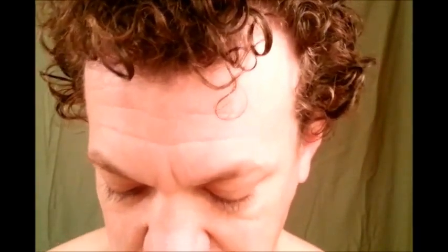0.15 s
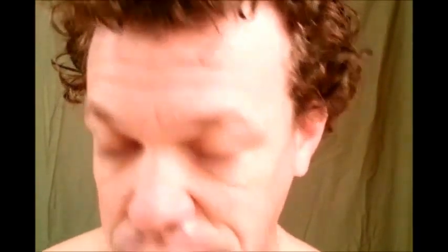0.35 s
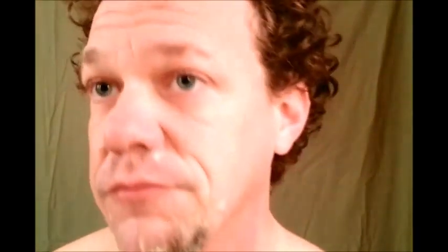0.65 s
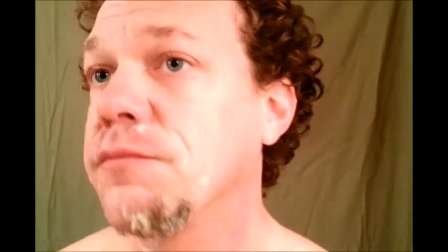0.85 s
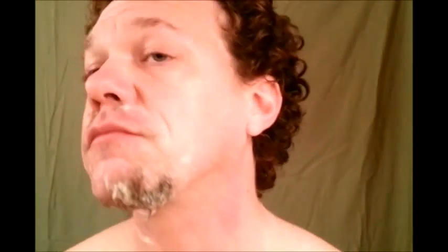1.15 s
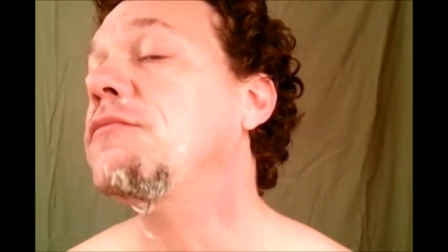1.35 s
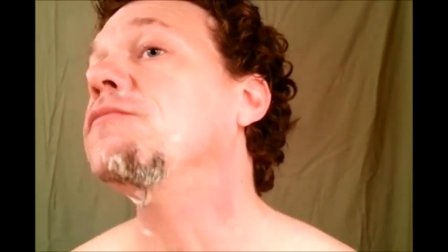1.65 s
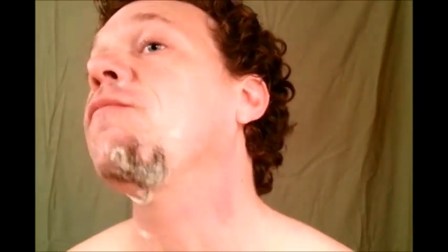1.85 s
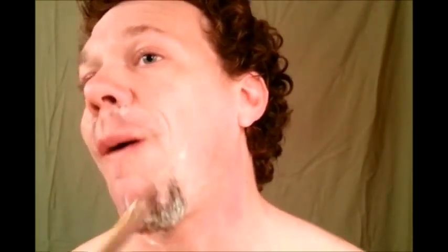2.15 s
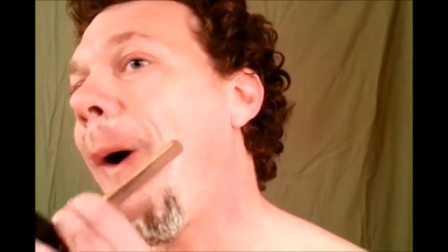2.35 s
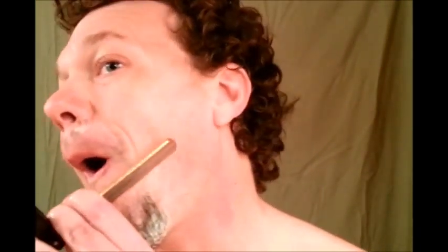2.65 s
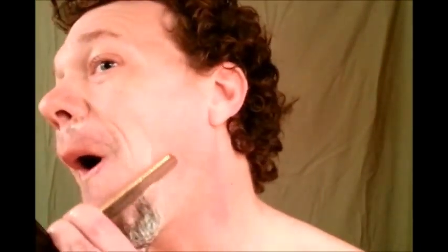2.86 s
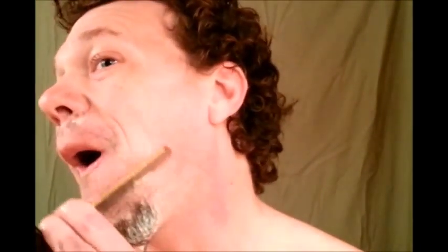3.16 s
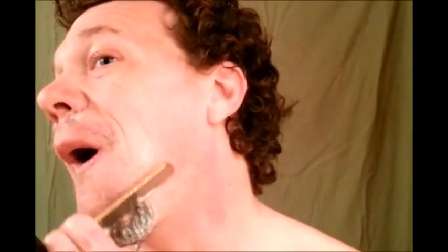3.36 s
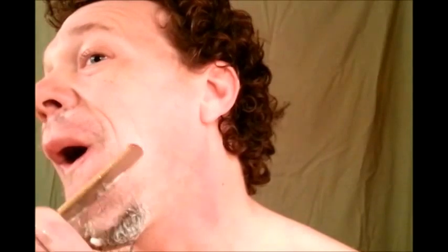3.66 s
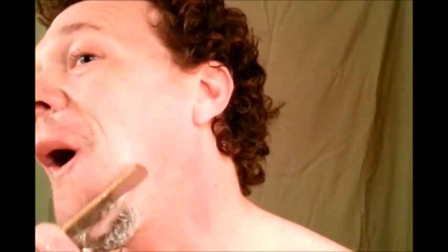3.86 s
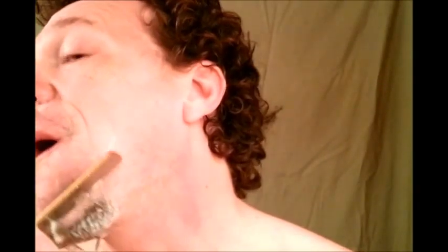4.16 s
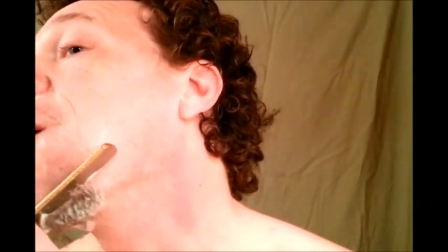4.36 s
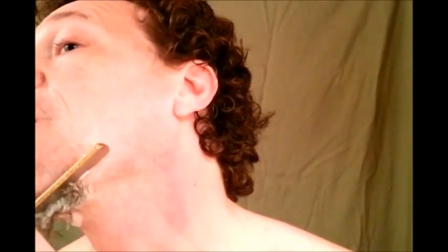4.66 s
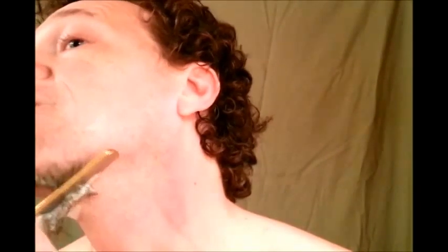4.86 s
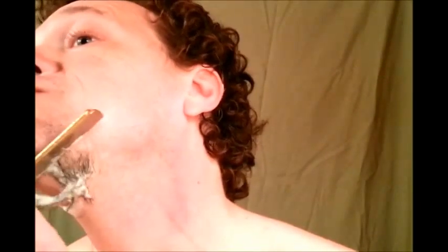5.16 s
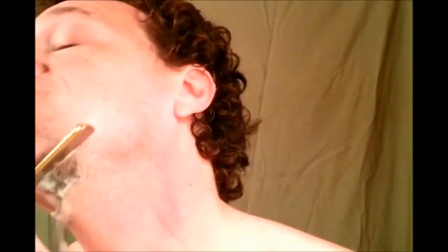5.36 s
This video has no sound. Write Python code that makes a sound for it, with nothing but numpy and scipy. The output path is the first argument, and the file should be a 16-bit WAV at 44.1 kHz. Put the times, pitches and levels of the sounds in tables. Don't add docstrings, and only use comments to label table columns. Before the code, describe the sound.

A bathroom tap hisses and shuts with a thud, the drain gurgles, a razor clinks on the rim, then crisp short strokes scrape stubble.

```python
import sys
import numpy as np
from scipy import signal
from scipy.fft import rfft, irfft, next_fast_len
from scipy.io import wavfile
from scipy.ndimage import uniform_filter1d

SR = 44100
rng = np.random.default_rng(int(sys.argv[2]) if len(sys.argv) > 2 else 0)


def natural_amplitude(level_db):
    exponent = np.asarray(level_db, float) / 20
    return 10 ** exponent


def wav_out(sig):
    wavfile.write(sys.argv[1], SR, np.round(np.clip(np.atleast_2d(sig).T, -1, 1) * 32767).astype(np.int16))


N = 243431
TIME = np.arange(N) / SR
PUFF_SAMPLES = 1000
POSE = SR // 11


def rms_one(x):
    return x / np.sqrt(np.mean(x ** 2) + 1e-20)


def filtered(x, order, hz, kind):
    return signal.sosfilt(signal.butter(order, hz, kind, fs=SR, output="sos"), x)


def coloured(x, spectrum):
    size = next_fast_len(N)
    hz, level_db = np.transpose(spectrum)
    log_hz = np.log(np.fft.rfftfreq(size, 1 / SR) + 1)
    gain = natural_amplitude(np.interp(log_hz, np.log(hz), level_db))
    return rms_one(irfft(rfft(x, size) * gain, size)[..., :N])


def drift(rate_hz):
    r = np.exp(-2 * np.pi * rate_hz / SR)
    slow = signal.lfilter([1], [1, -2 * r, r * r], rng.standard_normal(N + SR))
    return rms_one(slow[SR:])


def grains(per_s, spread_db):
    sizes = natural_amplitude(spread_db * np.minimum(rng.exponential(1, N), 5.5))
    signs = rng.choice([-1, 1], N)
    return sizes * signs * (rng.random(N) < per_s / SR)


def resonate(x, modes):
    out = 0
    for k, (hz, width_hz, level_db) in enumerate(modes):
        r = np.exp(-np.pi * width_hz / SR)
        poles = [1, -2 * r * np.cos(2 * np.pi * hz / SR), r * r]
        ring = signal.lfilter([1, 0, -1], poles, x + 1e-18)
        out = out + (-1) ** k * natural_amplitude(level_db) * (1 - r * r) * ring
    return rms_one(out)


def add(out, s, burst):
    at = round(s * SR)
    out[at:at + len(burst)] += burst[:N - at]


def tone(hz, t60, rise=0, swell=0.00025):
    t = np.arange(int(t60 * SR)) / SR
    sine = np.sin(2 * np.pi * hz * t * (1 + rise * t / t60 / 2))
    return sine * natural_amplitude(-60 * t / t60) * (1 - np.exp(-t / swell))


def crack(t60):
    return rng.standard_normal(PUFF_SAMPLES) * natural_amplitude(-60 * TIME[:PUFF_SAMPLES] / t60)


def stereo(mid, side, alike_hz):
    side = filtered(side, 1, alike_hz, "high")
    return np.array([mid + side, mid - side]) / np.sqrt(2)


# f/Hz, level/dB (per Hz)
QUIET_COLOUR = [(15, -39), (30, -18.5), (60, 1), (85, -4.5), (125, 0.5), (240, -2), (400, -7),
                (1000, -14.5), (2500, -20.5), (4000, -22.5), (6500, -26), (15000, -23.5)]
# f/Hz, width/Hz, level/dB
MOTOR_HUM = [(58.66, 7.2, 0.81), (118, 15, 2)]


def room_tone():
    hum_gain = natural_amplitude(-68.5 + 2.4 * drift(3))
    hum = hum_gain * resonate(rng.standard_normal(N), MOTOR_HUM)
    noise = stereo(*rng.standard_normal((2, N)), 180)
    return hum + natural_amplitude(-55.5) * coloured(noise * natural_amplitude(0.6 * drift(2.0)), QUIET_COLOUR)


JET_DB, SHUT_S = -34.5, 0.575
CHOKE_S, CHOKE_DB, DRIBBLE_S, DRIBBLE_DB = 0.1, 12, 0.13, 8
BOOM_DB, BOOM_LUMP_DB = -58.5, 1.5
HAMMER_DB, HAMMER_RISE_S, HAMMER_FALL_S = -33.5, 0.0088, 0.065


def flow():
    choked_s, choked_db = SHUT_S + CHOKE_S, JET_DB - CHOKE_DB
    turns_s = [SHUT_S, choked_s, choked_s + DRIBBLE_S]
    jet_db = np.interp(TIME, turns_s, [JET_DB, choked_db, choked_db - DRIBBLE_DB], right=-120)
    since = TIME - SHUT_S
    hammer_db = HAMMER_DB - 20 * np.maximum(-since / HAMMER_RISE_S, since / HAMMER_FALL_S)
    return jet_db, np.maximum(BOOM_DB + BOOM_LUMP_DB * drift(9), hammer_db)


# f/Hz, level/dB (per Hz)
JET_COLOUR = [(180, -56), (300, -8), (383, -1), (568, -3), (627, -11), (814, -6.5), (1270, -10.5),
              (1700, 2.5), (2600, -6), (3790, -3.5), (6000, -4), (9490, -11.5), (13800, -15.5),
              (15000, -25)]


def tap():
    jet_db, boom_db = flow()
    running = jet_db > -100
    pitches = np.geomspace(1500, 9000, 10)
    dealt = rng.integers(0, 10, N)
    born = grains(2500 * natural_amplitude(2.3 * drift(53)), 4.37) * running
    bubbles = 1.06 * resonate(born * (dealt == 0), [(1650, 130, 0)])
    for k, hz in enumerate(pitches):
        bubbles += resonate(born * (dealt == k), [(hz, hz / 9, 0)]) * np.sqrt(hz / 3000)
    hiss = rng.standard_normal(N) * natural_amplitude(0.5 * drift(19))
    spray = hiss + 0.26 * rms_one(bubbles)
    boom = resonate(rng.standard_normal(N), [(135, 33, 3.5), (327, 200, -9.5), (496, 94, -3.5)])
    spray = coloured(spray * running, JET_COLOUR) * np.sqrt(np.mean(running))
    return natural_amplitude(jet_db) * spray + natural_amplitude(boom_db - 3.5) * boom * running


# t/s, level/dB
PIPE_BREATH = [
    (0.0, -49.5),
    (0.67, -53),
    (0.9, -46),
    (1.3, -49),
    (1.75, -57.5),
    (2.05, -58.5),
    (2.2, -53),
    (2.3, -80),
]
# f/Hz, width/Hz, level/dB
PIPE_MODES = [(239.6, 24.3, 2), (277, 38, -2), (312, 13, 0), (380.6, 67, -10.5)]
# t/s, level/dB (peak), t60/s
PIPE_GLUGS = [(0.255, -34, 0.086), (0.284, -41.5, 0.078), (0.337, -32, 0.073), (0.36, -25, 0.057),
              (0.394, -37.5, 0.13), (0.584, -48, 0.33), (0.665, -37.5, 0.14), (0.72, -32, 0.13),
              (0.765, -40, 0.15), (0.85, -43.5, 0.12), (0.93, -35, 0.067), (0.97, -41.5, 0.24),
              (1.081, -29, 0.11), (1.113, -39, 0.059), (1.147, -26.5, 0.064), (1.19, -33, 0.13),
              (1.242, -35.5, 0.34), (1.287, -29, 0.089), (1.324, -32.5, 0.2), (1.438, -48, 0.08),
              (1.505, -34, 0.058), (1.55, -28.5, 0.043), (1.585, -32.5, 0.098), (1.66, -50, 0.31),
              (1.74, -53, 0.25), (1.84, -55, 0.17)]
COLUMN_HZ, REFILL_S, REFILL_HZ_PER_S, GLUG_SCATTER = 230.2, 1.33, 75, 0.0141


def drain_pipe():
    gusts = rng.standard_normal(N) * natural_amplitude(3.8 * drift(6.4))
    breath_db = np.interp(TIME, *np.transpose(PIPE_BREATH), right=-120)
    breath = natural_amplitude(breath_db - 0.5) * resonate(gusts, PIPE_MODES)
    swell, after = np.zeros(N), TIME[:POSE]
    for s, peak_db, t60 in PIPE_GLUGS:
        shape = natural_amplitude(-60 * after / t60) * (1 - np.exp(-after / 0.013))
        add(swell, s - 0.006, natural_amplitude(peak_db + 7) * shape)
    born = np.transpose(PIPE_GLUGS)[0]
    pitch = COLUMN_HZ + REFILL_HZ_PER_S * np.clip(born - REFILL_S, 0, None)
    pitch = pitch * (1 + GLUG_SCATTER * rng.standard_normal(len(born)))
    latest = np.clip(np.searchsorted(born - 0.006, TIME) - 1, 0, None)
    hz = pitch[latest]
    glugs = swell * np.sin(2 * np.pi * np.cumsum(hz) / SR)
    return filtered(breath + glugs, 2, 110, "high")


# t/s, level/dB (peak), f/Hz, splash level/dB (under the bubble)
WATER_DRIPS = [(0.0482, -21.5, 3260, -4), (0.1204, -10, 1875, -18), (0.292, -19.5, 4020, -30),
               (0.3185, -20.5, 4540, -33), (0.506, -26.5, 2770, -4), (0.5427, -23.5, 3380, -23),
               (0.6605, -34.5, 3690, -2.5), (0.7802, -59, 2430, -24), (0.8388, -34, 4500, -8),
               (0.935, -40.5, 890, -16), (1.052, -35.5, 3670, -15), (1.0735, -36.5, 7240, -11),
               (1.1735, -40, 4010, -14), (1.2318, -29.5, 2470, -27), (1.329, -32.5, 1780, -20),
               (1.33, -48, 9000, -6), (1.4336, -37, 2480, -6.5), (1.502, -40.5, 8800, -20),
               (1.5472, -33.5, 2480, -32), (1.5847, -40, 2160, -12), (1.8173, -41.5, 2810, -30)]


def drips():
    out = np.zeros(N)
    for s, peak_db, hz, splash_db in WATER_DRIPS:
        around = [(hz, 1.23 * hz, 0)]
        add(out, s, natural_amplitude(peak_db + 7.0) * tone(hz, 0.015, rise=0.13))
        add(out, s, natural_amplitude(peak_db + splash_db) * resonate(resonate(crack(0.0073), around), around))
    return out


# t/s, level/dB (peak)
WATER_SURGES = [(0.788, -46), (0.84, -41), (0.94, -44.5), (1.0, -59), (1.079, -44), (1.145, -43.5),
                (1.199, -46.5), (1.268, -45), (1.335, -45.5), (1.437, -39), (1.38, -53), (1.475, -42.5),
                (1.51, -45.5), (1.546, -43), (1.585, -48.5), (1.818, -67)]
SURGE_RISE_DB_PER_S, SURGE_FALL_DB_PER_S = 903, 230
SEEP_DB, SEEP_FALL_DB_PER_S, SEEP_END_S = -60.5, 4, 1.93
SPATTER_DB, SPATTER_FALL_DB_PER_S, SPATTER_UNDER_SURGE_DB = -41.5, 102, -15.5


def runoff():
    coarse = TIME[::50]
    peak_s, peak_db = np.array(WATER_SURGES).T[:, :, None]
    late = coarse - peak_s
    surge_db = peak_db - np.maximum(-SURGE_RISE_DB_PER_S * late, SURGE_FALL_DB_PER_S * late)
    surge = natural_amplitude(np.interp(TIME, coarse, surge_db.max(axis=0)))
    since = TIME - SHUT_S
    running = (TIME > SHUT_S) & (TIME < SEEP_END_S)
    seep = natural_amplitude(SEEP_DB - SEEP_FALL_DB_PER_S * since)
    spray = natural_amplitude(SPATTER_DB - SPATTER_FALL_DB_PER_S * since) + natural_amplitude(SPATTER_UNDER_SURGE_DB) * surge
    return running * (surge + seep), running * spray


# f/Hz, level/dB (per Hz)
TRICKLE_COLOUR = [(240, -47), (400, 4), (622, -2), (864, 0.5), (1200, -8.5), (1380, 3.5), (2000, -4.5),
                  (2480, -6.5), (6000, -9), (7800, -17.5), (13200, -120)]
# f/Hz, width/Hz, level/dB
BASIN_MODES = [(872, 120, -7.5), (1490, 48.6, -5), (1850, 64, -17), (2480, 50, 4.5), (2810, 70, -14),
               (3820, 91, -7), (4560, 160, 2), (5046, 34, -0.5)]


def trickle():
    drops = grains(1500 * natural_amplitude(7 * drift(30)), 3.33)
    corner = rng.integers(0, len(BASIN_MODES), N // 1000 + 1).repeat(1000)[:N]
    rings = 0
    for k, mode in enumerate(BASIN_MODES):
        rings = rings + natural_amplitude(mode[2]) * resonate(drops * (corner == k), [mode])
    trickle_gain, spatter_gain = runoff()
    water = rms_one(coloured(drops, TRICKLE_COLOUR) + 0.53 * rms_one(rings))
    spatter = rms_one(filtered(drops, 2, 6000, "high"))
    return natural_amplitude(-3.0) * (trickle_gain * water + spatter_gain * spatter)


# t/s, level/dB (peak), f/Hz, t60/s
DULL_KNOCKS = [(.585, -25, 710, 0.028), (.599, -34, 490, 0.024), (1.949, -38, 979, 0.025),
               (1.992, -30.5, 1550, .015), (2.548, -47, 560, 0.023), (2.649, -34.5, 1800, 0.033),
               (2.663, -41.5, 1100, 0.051), (2.756, -47, 1300, 0.032), (3.687, -42.5, 730, 0.062),
               (4.329, -40, 627, 0.015), (4.344, -25.5, 1110, 0.012), (4.356, -42, 900, .015),
               (5.012, -42, 1230, 0.022), (5.132, -42, 550, 0.012), (5.511, -41.5, 1020, .025)]
# t/s, level/dB (peak), f/Hz, t60/s
PIVOT_TICKS = [
    (2.657, -32, 1850, 0.098),
    (2.662, -41, 2740, 0.059),
    (2.765, -42, 1880, 0.066),
    (3.691, -41.5, 2810, 0.019),
    (4.262, -57, 2860, 0.06),
]


def knocks():
    out = np.zeros(N)
    for s, peak_db, hz, t60 in DULL_KNOCKS:
        push = filtered(crack(0.8 * t60), 4, [0.35 * hz, 1.35 * hz], "band")
        add(out, s, natural_amplitude(peak_db + 3.0) * tone(hz, t60, swell=0.0012))
        add(out, s, natural_amplitude(peak_db - 8) * rms_one(push))
    for s, peak_db, hz, t60 in PIVOT_TICKS:
        add(out, s, natural_amplitude(peak_db) * tone(hz, t60))
    return out


# t/s, level/dB (peak)
RIM_TOUCHES = [
    (2.1019, -23),
    (2.1046, -14.5),
    (2.1106, -33.5),
    (2.118, -23),
]
# f/Hz, level/dB, t60/s
RIM_MODES = [(2857, -6.5, 0.017), (3070, -2, .03), (3116, -4.5, 0.027), (3490, -14.5, .02),
             (4300, -49, 0.011)]


def clink():
    out = np.zeros(N)
    snap = [(344, 120, 8.5), (1300, 520, 9), (4260, 770, 8.5), (6900, 2000, 3.5), (13000, 4000, -28.5)]
    for s, peak_db in RIM_TOUCHES:
        for hz, level_db, t60 in RIM_MODES:
            add(out, s, natural_amplitude(peak_db + level_db + 10.5) * tone(hz, t60, swell=0.0007))
        add(out, s, natural_amplitude(peak_db - 15) * resonate(crack(0.0037), snap))
    return out


# touch t/s, hardest t/s, lift t/s, pressure level/dB, brightness level/dB
RAZOR_STROKES = [(2.747, 2.815, 2.845, -47.5, -6), (2.816, 2.867, 3.16, -49, -1),
                 (2.8, 3.052, 3.13, -40, -1), (3.32, 3.42, 3.5, -46, 0), (3.358, 3.513, 3.6, -32.5, -4),
                 (3.85, 3.919, 4.07, -36, -2.5), (4.1, 4.124, 4.17, -58, -9), (4.404, 4.42, 4.54, -48, 1),
                 (4.548, 4.577, 4.65, -45, -2), (4.665, 4.7, 4.8, -47, -5.5),
                 (4.68, 4.774, 4.86, -43, -6.5), (4.77, 4.853, 4.905, -46, -6),
                 (5.33, 5.392, 5.7, -47.5, -1)]
EDGE_DB, RISE_POWER, FALL_POWER = 29.5, 2.36, 1.69


def hand():
    touch, hardest, lift, level_db, bright_db = np.array(RAZOR_STROKES).T[:, :, None]
    t = TIME[::50]
    before = np.clip((hardest - t) / (hardest - touch), 0, 9)
    after = np.clip((t - hardest) / (lift - hardest), 0, 9)
    pressure_db = level_db - EDGE_DB * (before ** RISE_POWER + after ** FALL_POWER)
    bright_now = bright_db[pressure_db.argmax(axis=0), 0]
    return np.interp(TIME, t, pressure_db.max(axis=0)), np.interp(TIME, t, bright_now)


# t/s, level/dB (peak)
HAIR_TUFTS = [(2.7435, -32.5), (2.7955, -31), (2.849, -28), (3.0545, -19), (2.9833, -36), (3.0314, -29),
              (3.1146, -30), (3.4156, -40), (3.474, -34), (3.494, -22), (3.503, -30), (3.5235, -32),
              (3.559, -33), (3.8477, -38.5), (3.8766, -34), (3.8977, -32), (3.924, -37), (3.9514, -19),
              (3.9903, -21), (4.0566, -22), (4.123, -32.5), (4.416, -26), (4.4582, -26), (4.566, -32),
              (4.6867, -39), (4.7656, -20.5), (4.8584, -21.5), (5.3865, -34), (5.4144, -31), (5.456, -32.5)]
# f/Hz, level/dB (per Hz)
CUT_COLOUR = [(1650, -78), (2800, -21), (3710, -12), (4030, -4.5), (4800, 1), (5530, 1), (8490, -6.5),
              (9170, -11), (13800, -20), (15000, -19)]
# f/Hz, width/Hz, level/dB
BLADE_MODES = [(4084, 51, -5.5), (4540, 84, 12), (4995, 28, -3), (5360, 18, -23.5), (5850, 47, 0),
               (5960, 20, 18), (6560, 260, 33.5), (6780, 27, 26), (8730, 39, -25), (9630, 25, 6)]
# f/Hz, level/dB (per Hz)
SCRAPE_COLOUR = [(240, -51), (400, -11.5), (972, -5.5), (1200, -9), (1360, -1), (1580, -5.5), (2130, 2.5),
                 (3200, -15), (4160, -6.5), (7040, -120)]
DRAG_DB, DRAG_FOLLOWS = -57, 0.61


def razor():
    pressure_db, bright_db = hand()
    hairs = natural_amplitude(pressure_db - 1.8) * rms_one(grains(4000 * natural_amplitude(4 * drift(60)), 3.68))
    drag_db = DRAG_DB + 46 - (1 - DRAG_FOLLOWS) * (pressure_db + 43.5)
    drag = hairs * natural_amplitude(np.minimum(drag_db, 9.0))
    for s, peak_db in HAIR_TUFTS:
        add(hairs, s, natural_amplitude(peak_db - 10) * crack(0.012))
    snap = coloured(hairs, CUT_COLOUR)
    damped_blade = np.multiply(BLADE_MODES, [1, 2.5, 1])
    snap = rms_one(snap + 0.099 * resonate(snap, damped_blade))
    top = signal.sosfiltfilt(signal.butter(2, 5800, "high", fs=SR, output="sos"), snap)
    steel = snap + top * (natural_amplitude(np.clip(bright_db + 2.5, -12, 8)) - 1)
    return np.std(hairs) * steel + natural_amplitude(1.0) * np.std(drag) * coloured(drag, SCRAPE_COLOUR)


# f/Hz, t60/s
ROOM_DECAY = [(200, 0.2), (1000, 0.22), (3000, 0.18), (12000, 0.17)]
EARLY_DB, EARLY_S = 10, 0.0027
DIRECT_DB, ALIKE_BELOW_HZ = -8.5, 360


def echoes(count):
    t, tail = TIME[:2 * POSE], 0
    middles = [np.sqrt(a[0] * b[0]) for a, b in zip(ROOM_DECAY, ROOM_DECAY[1:])]
    edges = [30] + middles + [20000]
    dense = stereo(*rng.standard_normal((2, count, len(t))), ALIKE_BELOW_HZ)
    dense = dense * np.clip(t / 0.002, 0, 1) * (1 + natural_amplitude(EARLY_DB) * np.exp(-t / EARLY_S))
    for (hz, t60), low, high in zip(ROOM_DECAY, edges, edges[1:]):
        band = filtered(dense, 2, [low, high], "band")
        tail = tail + band * natural_amplitude(-60 * t / t60) / np.sqrt(t60)
    tail = rms_one(tail) / np.sqrt(len(t))
    tail[0, np.arange(count), rng.integers(3, 10, count)] += natural_amplitude(DIRECT_DB)
    tail[1, :, 0] += natural_amplitude(DIRECT_DB)
    return tail


def bathroom(x):
    starts = np.arange(0, N + POSE, POSE)
    out = np.zeros((2, N + 2 * SR))
    fade = np.sin(np.pi * np.arange(2 * POSE) / (2 * POSE))
    x = np.pad(x, (POSE, 2 * POSE))
    pieces = np.array([x[at:at + 2 * POSE] * fade for at in starts])
    wet = signal.fftconvolve(pieces[None], echoes(len(starts)), axes=2)
    for k, at in enumerate(starts):
        out[:, at:at + wet.shape[2]] += wet[:, k]
    return out[:, POSE:N + POSE]


def scene():
    drain_water = trickle()
    column = drain_pipe() * natural_amplitude(np.array([[0.4], [-0.4]]))
    near = natural_amplitude(6.5) * (tap() + drain_water + razor()) + drips() + knocks() + clink()
    return bathroom(near) + column + natural_amplitude(1.0) * room_tone()


def low_pass(x):
    return signal.sosfilt(signal.butter(12, 15700, fs=SR, output="sos"), x)


def record(dry):
    bass = signal.sosfiltfilt(signal.butter(2, 95, fs=SR, output="sos"), dry)
    pipe = filtered(dry, 2, [180, 350], "band")
    treble = np.diff(dry, prepend=0)
    power = np.mean(treble ** 2 + 0.6 * pipe ** 2, axis=0)
    loud_db = 10 * np.log10(uniform_filter1d(power, size=3000) + 1e-12)
    duck = 1 - natural_amplitude(-np.clip(3.6 * (loud_db + 48.5), 0, 16))
    top_cut = signal.ellip(10, 0.5, 55, 14550, fs=SR, output="sos")
    return low_pass(signal.sosfilt(top_cut, dry - duck * bass))


dry = scene()
out = record(dry)
wav_out(out)
```